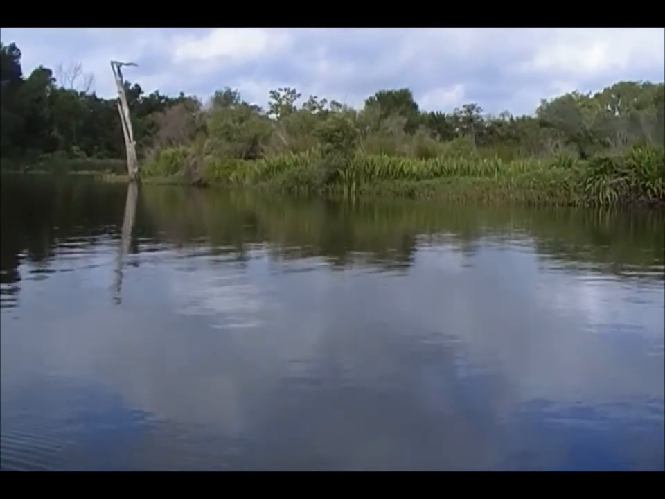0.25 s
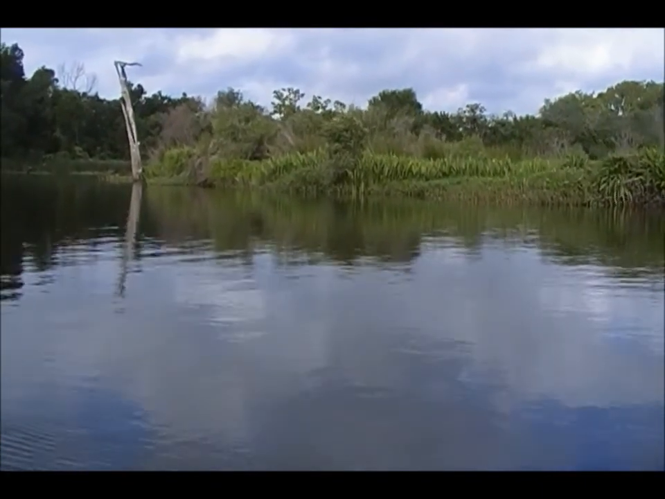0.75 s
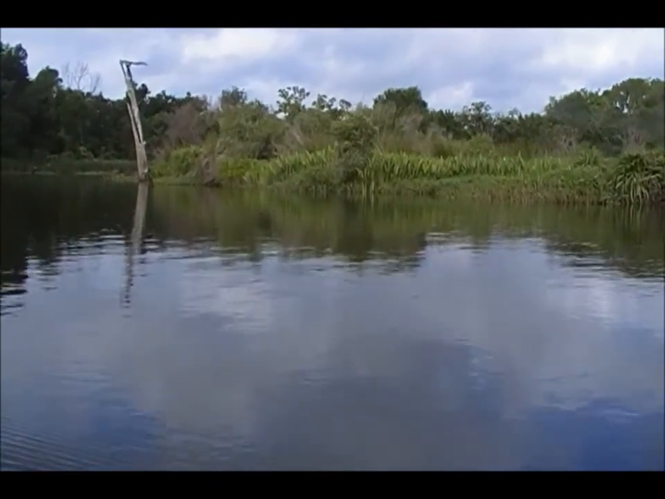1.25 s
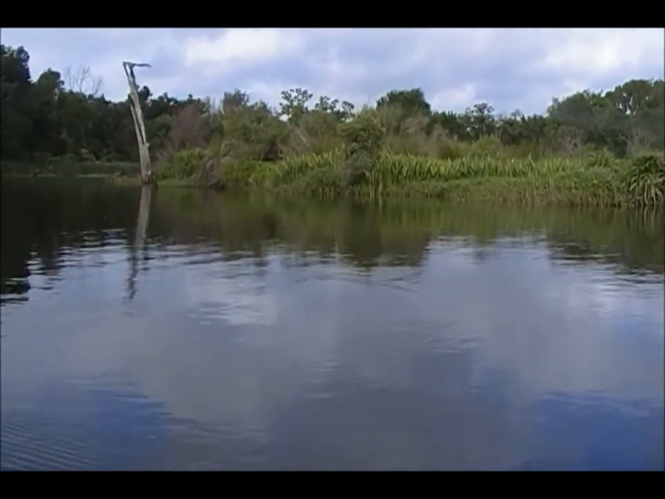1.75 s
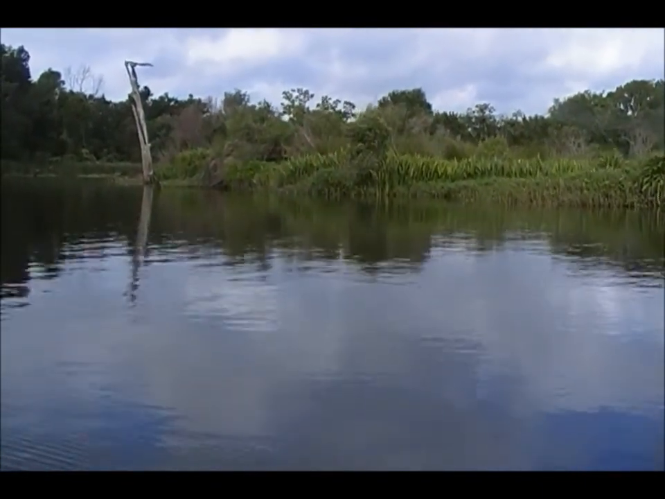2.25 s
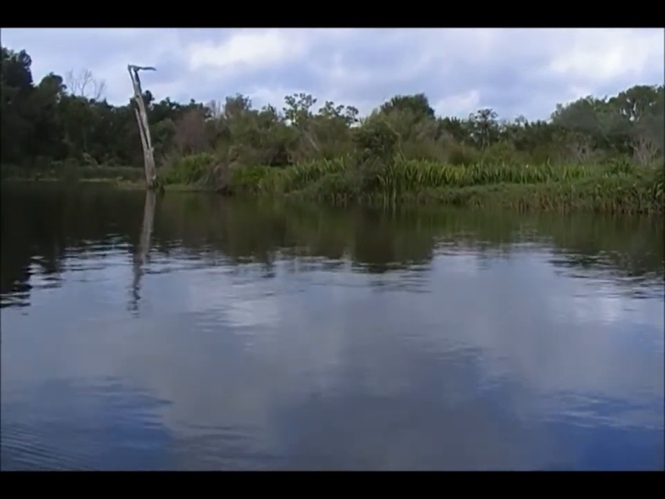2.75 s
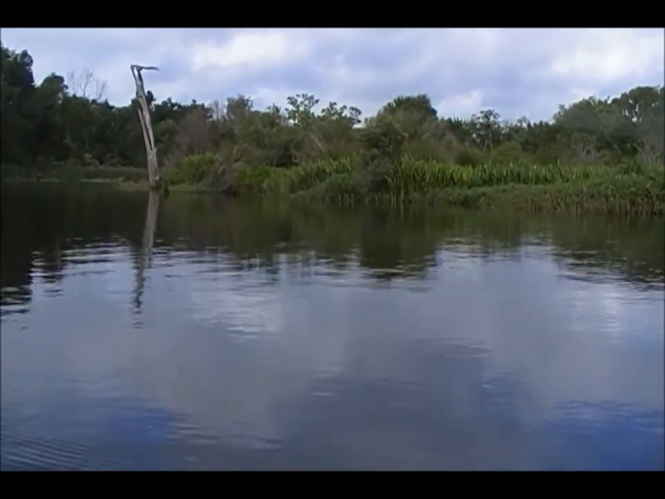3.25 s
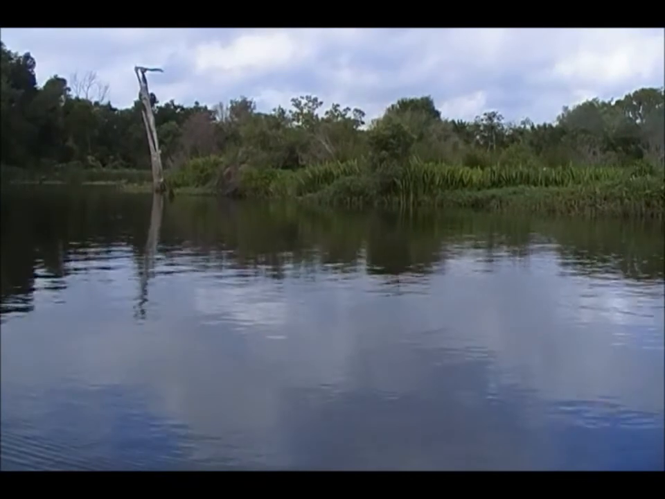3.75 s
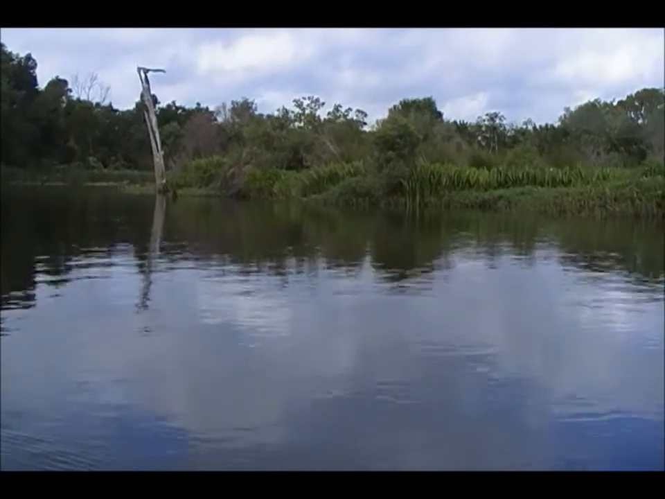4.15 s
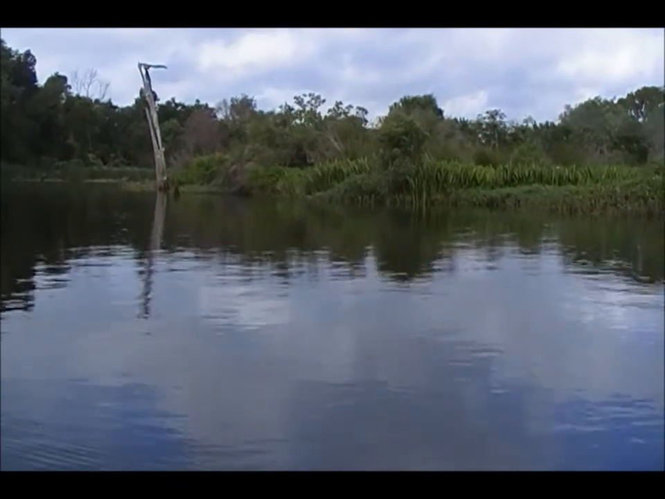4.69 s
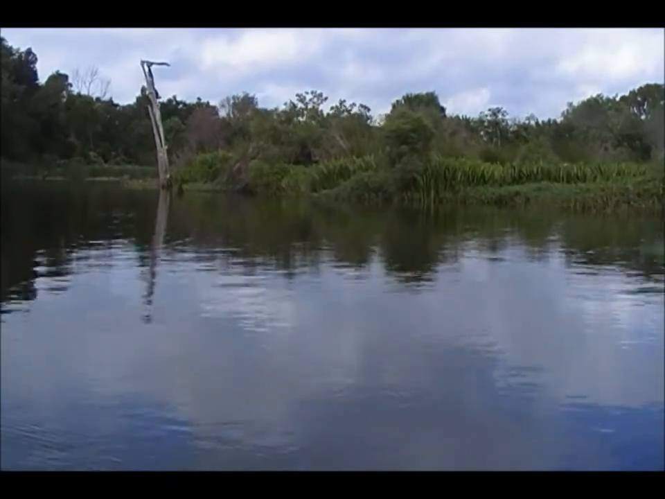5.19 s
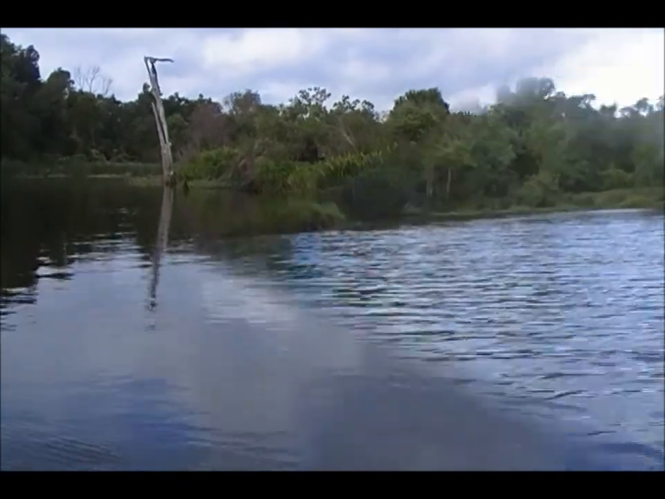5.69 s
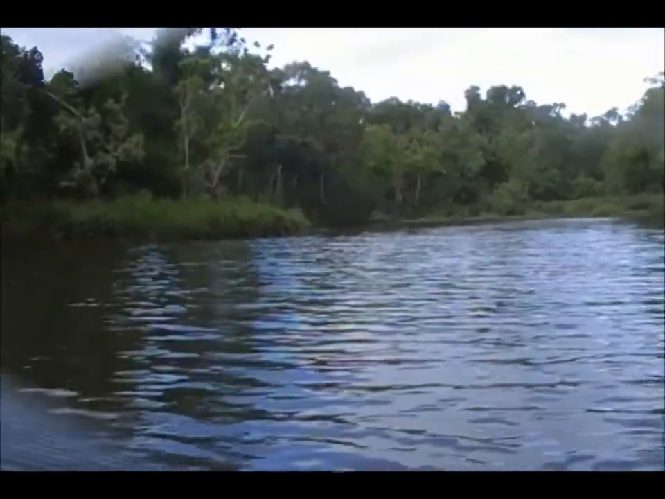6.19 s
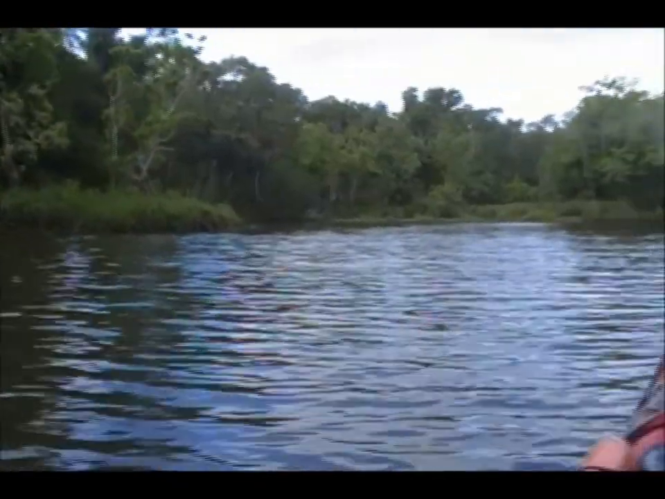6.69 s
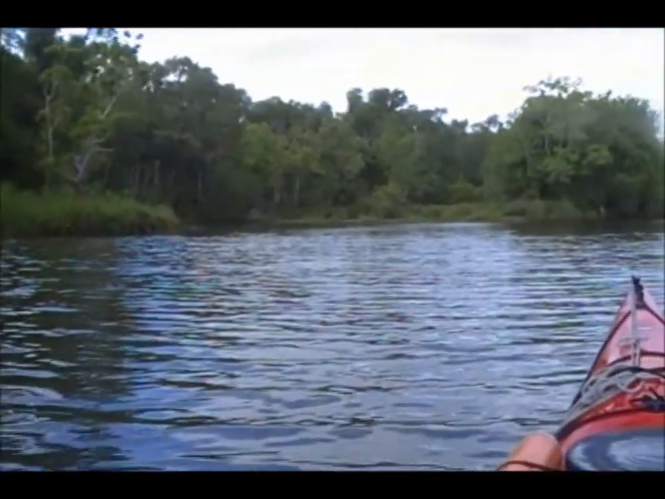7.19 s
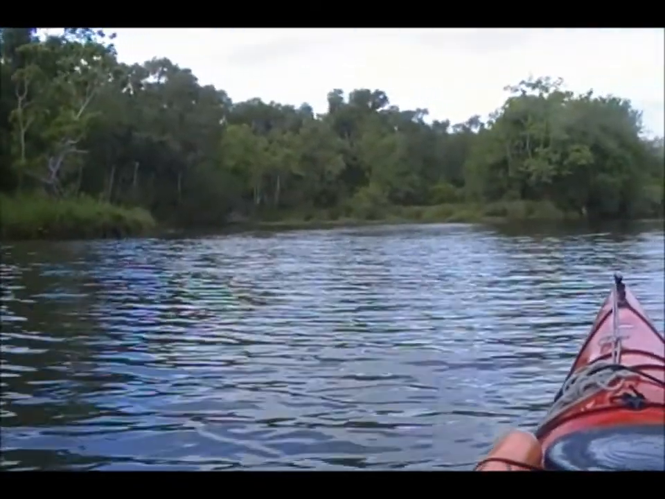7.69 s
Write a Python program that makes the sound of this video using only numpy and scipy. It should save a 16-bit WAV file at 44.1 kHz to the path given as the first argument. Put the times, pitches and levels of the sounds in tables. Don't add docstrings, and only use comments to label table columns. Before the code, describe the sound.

A quiet outdoor wetland in stereo, with soft airy hiss of leaves and water and a low breezy rumble. From 0 to 2 s wind buffets the microphone in irregular dull thumps, heaviest in the first second; another cluster comes around 3.2-3.6 s. A high insect whine near 6 kHz and a fainter pulsing cricket lie to the left. Two low dove coos sound at 0.1 and 0.4 s, with faint chips and buzzes. A long soft whistle at 1.5 s leads into rising whips about every quarter second from 1.9 to 3.8 s, each ending in a sharp upward flick, increasingly echoey, with a faint stub at 4.3 s. At 5.2 s the scene switches abruptly: the insect chorus is clearly louder and more central, the wind smoother. Close chips, pipes and raspy buzzes crowd 5.25-5.9 s. From 6.4 s to the end, six falling whistled slurs repeat every quarter second, most with short answers and light bank echo.

```python
import sys
import numpy as np
from scipy import signal
from scipy.fft import rfft, irfft
from scipy.io import wavfile

SR = 44100
rng = np.random.default_rng(int(sys.argv[2]) if len(sys.argv) > 2 else 0)


def ratio_of_db(decibels):
    return 10 ** (np.asarray(decibels, float) / 20)


def transcribe(u):
    v = np.clip(np.atleast_2d(u).T, -1, 1)
    q = np.round(v * 32767).astype(np.int16)
    wavfile.write(sys.argv[1], SR, q)


N = 350154


def in_time(rows):
    s, *columns = np.transpose(rows)
    return [np.interp(np.arange(N) / SR, s, column) for column in columns]


def drift(rate_hz):
    r = np.exp(-40 * np.pi * rate_hz / SR)
    coarse = rng.standard_normal(N // 20 + 4002)
    slow = signal.lfilter([1], [1, -2 * r, r * r], coarse)[4000:]
    return np.interp(np.arange(N) / 20, np.arange(len(slow)), slow / slow.std())


def pan(x, left_db):
    return x * ratio_of_db(np.array([left_db / 2, -left_db / 2]).reshape(2, -1))


def at_spot(first, second):
    change_s = 5.212
    share = np.clip((np.arange(N) / SR - change_s) / .012 + .5, 0, 1)
    return first * (1 - share) + second * share


def stereo_colour(shared, own, gain, alike, left_db, lead):
    side = np.array([[1], [-1]])
    turn = np.exp(1j * np.pi * np.arange(N // 2 + 1) / N * lead * side)
    alike = np.clip(alike, 0, 1)
    mix = np.sqrt(alike) * rfft(shared) * turn + np.sqrt(1 - alike) * rfft(own)
    return irfft(pan(mix * gain, left_db), N)


def bed(table, lead):
    hz, *columns = np.transpose(table)
    bins = np.log(np.arange(N // 2 + 1) * SR / N + 1)
    level_db, alike, left_db = [np.interp(bins, np.log(hz), column) for column in columns]
    white = rng.standard_normal((3, N))
    return stereo_colour(white[0], white[1:], ratio_of_db(level_db) * np.sqrt(SR / 2), alike, left_db, lead)


# freq_hz, level_db_per_hz, alike_0_1, left_right_db
FIRST_BED = [(30, -62, 0.7, 14), (70, -61, 0.79, 1), (150, -61, 0.97, -0.5), (300, -72, 1, 1),
             (633, -76.5, 0.93, 0), (1290, -84, 0.77, 1.5), (1500, -81.5, 0.57, -5),
             (2100, -86.5, 0.57, 0.5), (3180, -86.5, 0.58, 0), (4580, -89.5, 0.32, 1.5), (7700, -92, 0, 6),
             (8300, -92.5, 0.4, 11), (9200, -91.5, 0, -3), (12100, -97.5, 0, 3.5)]
# freq_hz, level_db_per_hz, alike_0_1, left_right_db
SECOND_BED = [(29.8, -73, 0.94, 1), (70, -62, 0.98, 0.91), (194, -60.5, 0.99, 0.66),
              (276, -63.5, 0.98, 0.77), (384, -73, 0.95, 1), (590, -74, 0.94, 1), (1150, -81.5, 0.75, 1.2),
              (2100, -83.5, 0.58, 1.1), (4380, -86.5, 0.43, 1), (7300, -87.5, 0.26, 4.1),
              (8200, -81, 0.34, 4), (8770, -89, 0.49, 3), (8600, -89, 0.18, 2), (11900, -92.5, 0.33, 1)]
# time_s, level_db
BREEZE_SWELL = [(0, 0.5), (1.3, -1), (1.55, 0.5), (1.8, 0), (5.2, 0), (5.22, 2.5), (5.8, 1), (6.1, 1),
                (6.35, 2), (6.65, 2), (6.9, -1), (7.94, -1.5)]


def moving_air():
    air = at_spot(bed(FIRST_BED, lead=1.7), bed(SECOND_BED, lead=.4))
    swell_db, = in_time(BREEZE_SWELL)
    moan = signal.lfilter(*signal.butter(1, [220, 400], "band", fs=SR), air)
    air = air + (ratio_of_db(-0.34 * swell_db) - 1) * moan
    return air * ratio_of_db(swell_db + .45 * drift(4.8))


# time_s, level_db, left_right_db
PORT_RUMBLE = [(0, -32, 12), (.09, -27.5, -10), (.33, -35, 9), (.48, -23, 12.5), (.53, -51, 0),
               (.59, -33, -11), (.67, -38.5, 17), (.85, -37, 0), (.93, -29.5, 9), (1.5, -30.5, 8.5),
               (1.66, -36.5, 11), (1.92, -31, 1.5), (2.4, -55, 6), (2.85, -50.5, 10), (3.3, -31.5, 5),
               (3.7, -35, 1.5), (4.35, -53, 7), (5.2, -62, 3)]


def wind():
    level_db, left_db = in_time(PORT_RUMBLE)
    flutter_db = -26 - 0.3 * (level_db + 42)
    lumps_db = 1.8 * np.array([drift(7.2) for side in range(2)])
    white = rng.standard_normal((2, N)) * ratio_of_db(lumps_db)
    low = signal.sosfilt(signal.butter(3, [18, 170], "band", fs=SR, output="sos"), white)
    high = signal.sosfilt(signal.butter(3, [150, 280], "band", fs=SR, output="sos"), white)
    rumble = low / low.std() + ratio_of_db(flutter_db) * high / high.std()
    return at_spot(pan(ratio_of_db(level_db + 2.0) * rumble, left_db), 0)


# centre_s, peak_db, swing_hz, length_cycles, left_right_db
PORT_EDDIES = [(.09, -26, 81, 1.1, -25), (0.236, -21.5, 80, 0.89, 20), (.425, -37, 140, 3.6, 15),
               (0.46, -16.5, 99, 1.2, -4), (0.478, -19, 205, 0.6, 30.5), (0.582, -25, 81, 1.2, -12),
               (0.733, -21, 115.6, 1.1, 16), (0.941, -14, 79.5, 0.43, 16), (0.941, -24, 300, 1, 23),
               (0.993, -20, 60, 1.4, 8), (1.079, -19, 150, 0.7, 23), (1.23, -19.5, 80, 0.55, 20),
               (1.294, -21, 114, 0.75, 19), (1.425, -23.5, 79, 2.4, 16), (1.877, -19.5, 79.6, 0.87, 13),
               (3.178, -23, 60, 0.88, 16), (3.356, -18.5, 70, 1.06, -9), (3.414, -15, 90, 0.56, 17),
               (3.457, -14, 101, 0.66, 9), (3.621, -28, 80, 1.2, 18), (4.759, -25, 70, 0.62, 19),
               (6.65, -35.5, 35, 1.3, -20)]


def thumps():
    out = np.zeros((2, N))
    start_phase = rng.uniform(-1.0, 1, (len(PORT_EDDIES), 1))
    for (s, level_db, hz, cycles, left_db), turn in zip(PORT_EDDIES, start_phase):
        t = np.arange(-.05, .05, 1 / SR) * hz
        puff = np.cos(2 * np.pi * t * (1 + .05 * t) + turn) * np.exp(-(2 * t / cycles) ** 2)
        out[:, round((s - .05) * SR):][:, :len(t)] += pan(ratio_of_db(level_db) * puff, left_db)
    return signal.sosfilt(signal.butter(2, 40, "high", fs=SR, output="sos"), out)


def chorus(hz, spread_hz, alike, left_db, lead):
    throb_phase = 2 * np.pi * np.cumsum(45 + 3 * drift(2.07)) / SR
    throb = ratio_of_db(0.54 * drift(8.8) + 1.0 * np.sin(throb_phase))
    clicks = (rng.random((3, N)) < 9000 / SR) * rng.standard_normal((3, N)) * throb
    off = (np.arange(N // 2 + 1) * SR / N - hz) / spread_hz
    crowd = np.exp(-off ** 2 / 4)
    smaller_kind = ratio_of_db(-11) * np.exp(-((off - 1.9) / 0.46) ** 2)
    skirt = ratio_of_db(-14) / (1 + (off / 3) ** 2)
    song = stereo_colour(clicks[0], clicks[1:], crowd + smaller_kind + skirt, alike, left_db, lead)
    return song / song.mean(0).std()


def cricket(level_db, left_db, depth):
    stroke = 2 * np.pi * np.cumsum(30.5 + .4 * drift(1)) / SR
    hz = 7882 + 3 * drift(6) - 30 * np.sin(stroke - .6)
    tone = np.sin(2 * np.pi * np.cumsum(hz) / SR)
    return pan(ratio_of_db(level_db + 0.85 * drift(25)) * (1 + depth * np.sin(stroke)) * tone, left_db)


# centre_hz, spread_hz, alike_0_1, left_right_db, left_lead_samples
CHORUS = [
    (5908, 178, 0.59, 11, 1.5),
    (5798, 172, 0.65, 4, 0.2),
]
# level_db, left_right_db, pulse_depth
CRICKET_SPOTS = [
    (-63.5, 11, .35),
    (-64, 6, .35),
]


def insects():
    crowds = [ratio_of_db(db + .2 * drift(1.0)) * chorus(*spot) for db, spot in zip((-43, -35), CHORUS)]
    return at_spot(*crowds) + at_spot(*[cricket(*spot) for spot in CRICKET_SPOTS])


def add(out, rows, warble_hz=0, overtone_db=-60):
    s, hz, level_db = np.transpose(rows)
    first = round(s[0] * SR)
    t = np.arange(first, min(round(s[-1] * SR), N)) / SR
    ends = np.clip(np.minimum(t - s[0], s[-1] - t) / .003, 0, 1)
    warble = 2 * np.pi * 140 * t + np.cumsum(rng.normal(0, 0.071, len(t)))
    phase = 2 * np.pi * np.cumsum(np.interp(t, s, hz) + warble_hz * np.sin(warble)) / SR
    tone = np.sin(phase) + ratio_of_db(overtone_db) * np.sin(2 * phase)
    out[first:][:len(t)] += ends * ratio_of_db(np.interp(t, s, level_db) + 6.5) * tone


def coo(s, length, top_hz, level_db):
    return [(s, .8 * top_hz, level_db - 13),
            (s + 0.313 * length, .95 * top_hz, level_db),
            (s + 0.57 * length, top_hz, level_db - 10.5),
            (s + length, .87 * top_hz, level_db - 13)]


# start_s, length_s, top_hz, level_db
DOVE_COOS = [
    (.11, .108, 706, -33),
    (0.367, 0.072, 698, -36.5),
]


def dove():
    out = np.zeros(N)
    for row in DOVE_COOS:
        add(out, coo(*row), overtone_db=-22)
    return out


# start_s, length_s, start_hz, end_hz, level_db
HIGH_CHIPS = [(0.4, 0.0225, 6500, 7700, -58), (.61, .021, 6800, 6500, -66), (2.258, .014, 7800, 6900, -57),
              (2.337, .02, 7800, 7100, -59), (2.697, .008, 7200, 8600, -48), (4.42, 0.022, 6900, 6470, -61),
              (4.752, 0.013, 6560, 8000, -51), (5.33, 0.047, 6630, 6700, -58),
              (5.585, .03, 6750, 6400, -47), (5.617, .01, 5300, 4500, -51), (5.865, .017, 5130, 3980, -52)]
# start_s, length_s, start_hz, end_hz,
# level_db
LOW_PIPES = [(2.14, .045, 2570, 2700, -65), (2.429, .03, 2020, 2550, -61), (3.941, .105, 1763, 2980, -62),
             (4.072, .069, 2860, 3150, -61), (4.19, .09, 2590, 2550, -68), (5.255, .021, 4200, 4370, -42.5),
             (5.273, .016, 3900, 3420, -50), (5.31, .036, 2500, 2900, -51), (5.346, .026, 3200, 3260, -42),
             (5.38, .019, 2550, 2780, -53), (5.432, .028, 2750, 2205, -51), (6.903, .014, 2300, 1370, -47)]
# start_s, length_s, pitch_hz, level_db, warble_hz
BIRD_BUZZES = [
    (.245, .06, 7520, -66, 150),
    (.42, 0.1, 7300, -65, 450),
    (4.043, 0.062, 7400, -60, 458),
    (5.265, 0.11, 6940, -54, 200),
    (5.463, .15, 7000, -52, 170),
    (5.68, 0.14, 6980, -53, 250),
]


def small_birds():
    out = np.zeros(N)
    for s, length, start_hz, end_hz, level_db in HIGH_CHIPS + LOW_PIPES:
        add(out, [(s, start_hz, level_db), (s + length, end_hz, level_db - 2.0)], warble_hz=50)
    for s, length, hz, level_db, warble_hz in BIRD_BUZZES:
        add(out, [(s, hz + 50, level_db), (s + length, hz - 50, level_db - 0.5)], warble_hz)
    return out


# start_s, top_hz, slur_db, answer_db
SLUR_PHRASES = [
    (6.4, 3120, -52, -66),
    (6.655, 3080, -49, -55),
    (6.91, 3150, -50, -57),
    (7.158, 3200, -49, -55),
    (7.42, 3080, -50, -56),
    (7.695, 3020, -55, -60),
]


def falling_song():
    out = np.zeros(N)
    low_hz, fall_s, hold_s, sag_hz_per_s = 2730, .052, .05, 60
    for s, top_hz, slur_db, answer_db in SLUR_PHRASES:
        held_hz = low_hz - sag_hz_per_s * (s - 6.4)
        turn_s = s + fall_s
        add(out, [(s, top_hz, slur_db - 7.0),
                  (s + .5 * fall_s, .55 * top_hz + .45 * held_hz + 30, slur_db),
                  (turn_s, held_hz + 50, slur_db - 1.5),
                  (turn_s + hold_s, held_hz, slur_db - 4.0)], warble_hz=45)
        answer_s = s + .162
        add(out, [(answer_s, 2850, answer_db), (answer_s + .05, low_hz - 40, answer_db + 4.0)], warble_hz=60)
    return out


def whip(s, length, start_hz, level_db, top_hz):
    bend_hz, end_hz = 3200, 3370
    return [(s - length, start_hz, level_db - 14.5),
            (s - .035, bend_hz - 0.025 / length * (bend_hz - start_hz), level_db - 5.0),
            (s - .01, bend_hz, level_db - 2.5),
            (s, end_hz, level_db + 4.5),
            (s + .008, top_hz, level_db - 8)]


def lead_in(s, length, hz, level_db):
    sag_hz, drop_hz, swell_db = 100, 300, 6.5
    return [(s, hz, level_db),
            (s + .75 * length, hz - sag_hz, level_db + 3),
            (s + .9 * length, hz - .65 * drop_hz, level_db + swell_db),
            (s + length, hz - drop_hz, level_db + swell_db)]


# start_s, length_s, pitch_hz, level_db
OPENING_WHISTLE = (1.49, .302, 2915, -63)
# flick_s, length_s, start_hz, level_db, flick_top_hz
RISING_WHIPS = [
    (1.943, 0.05, 3130, -48.5, 5300),
    (2.264, .065, 2960, -46.5, 5250),
    (2.54, 0.058, 2750, -45, 4470),
    (2.8, 0.1, 2450, -44.5, 4400),
    (3.051, 0.095, 2550, -45, 4400),
    (3.303, 0.074, 2600, -48, 4230),
    (3.567, 0.12, 2100, -51, 4160),
    (3.831, 0.11, 2370, -52, 4050),
    (4.308, 0.039, 2700, -64, 3500),
]


def rising_song():
    to_boat, to_bank = np.zeros((2, N))
    turns_s, turn_db_per_s = 2.3, 4.5
    for s, length, start_hz, level_db, top_hz in RISING_WHIPS:
        echo_db = turn_db_per_s * max(s - turns_s, 0) - 3
        add(to_boat, whip(s, length, start_hz, level_db, top_hz))
        add(to_bank, whip(s, length, start_hz, level_db + echo_db, top_hz))
    opening = lead_in(*OPENING_WHISTLE)
    add(to_boat, opening)
    add(to_bank, np.add(opening, [0, 0, -12]))
    return to_boat, to_bank


def tree_line(x, t60, slap_s, dull_hz):
    t = np.arange(round(.7 * SR)) / SR
    shape = ratio_of_db(-60 * t / t60) * np.clip(t / 0.002, 0, 1) + 0.13 * np.exp(-((t - slap_s) / 0.01) ** 2)
    tail = rng.standard_normal((3, len(t))) * shape
    tail = (tail[0] + 1.15 * tail[1:]) / np.sqrt((shape ** 2).sum())
    dull = signal.sosfilt(signal.butter(2, dull_hz, fs=SR, output="sos"), x)
    return signal.fftconvolve(dull[None], tail, axes=1)[:, :N]


def birds():
    rising, facing_bank = rising_song()
    falling, small, coos = falling_song(), small_birds(), dove()
    flicker = ratio_of_db(1.8 * drift(30))
    whistles = pan(flicker * (rising + ratio_of_db(-3.0) * falling), 2.6)
    direct = whistles + pan(flicker * small, at_spot(8.5, 1.9)) + pan(coos, .6)
    to_near_bank = facing_bank + ratio_of_db(-2.5) * falling + ratio_of_db(-13) * coos
    near_bank = tree_line(to_near_bank, .7, slap_s=.045, dull_hz=3500)
    far_bank = tree_line(ratio_of_db(-2.0) * small, 0.6, slap_s=0.14, dull_hz=8000)
    return direct + near_bank + pan(far_bank, 3.0)


def scene():
    return moving_air() + wind() + thumps() + insects() + birds()


def low_pass(x):
    return signal.sosfilt(signal.butter(12, 12270, fs=SR, output="sos"), x)


def record(dry):
    rounded = .62 * np.tanh(dry / .62)
    cut = signal.sosfilt(signal.ellip(12, .5, 55, 11800, fs=SR, output="sos"), rounded)
    return low_pass(cut)


dry = scene()
out = record(dry)
transcribe(out)
```